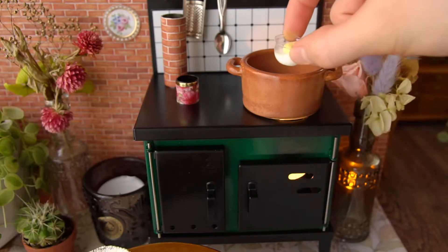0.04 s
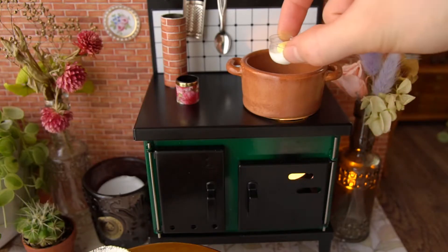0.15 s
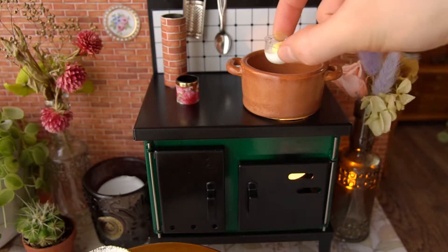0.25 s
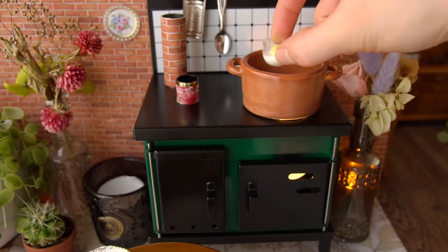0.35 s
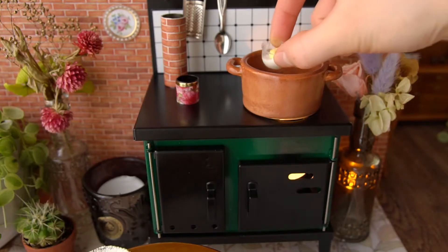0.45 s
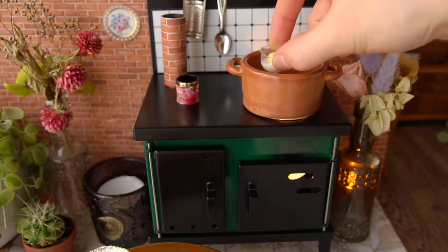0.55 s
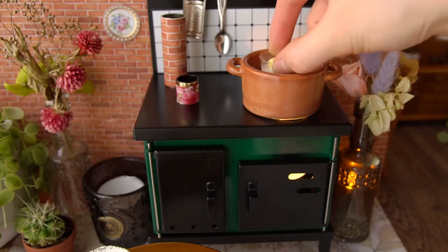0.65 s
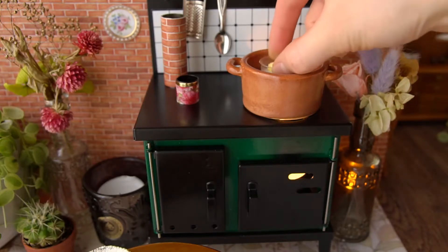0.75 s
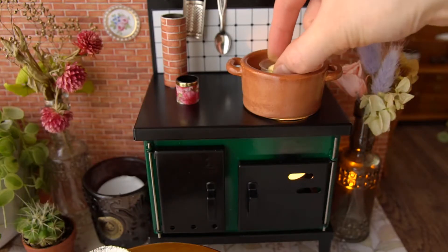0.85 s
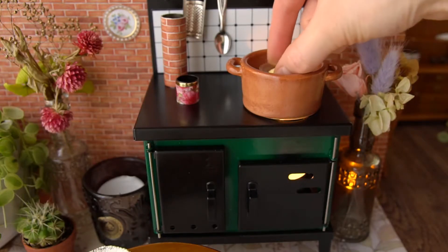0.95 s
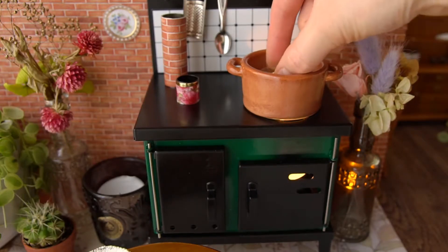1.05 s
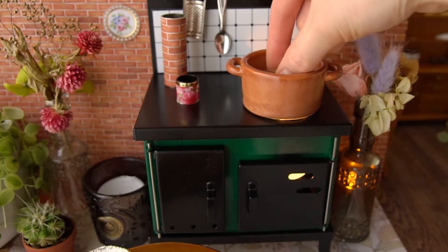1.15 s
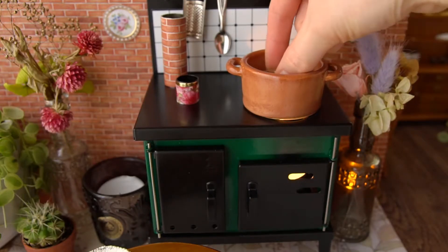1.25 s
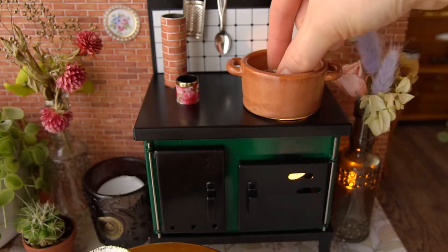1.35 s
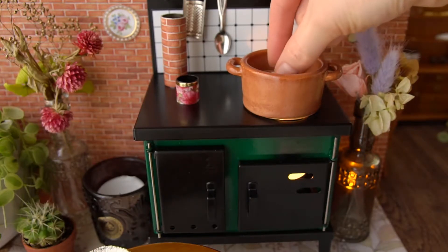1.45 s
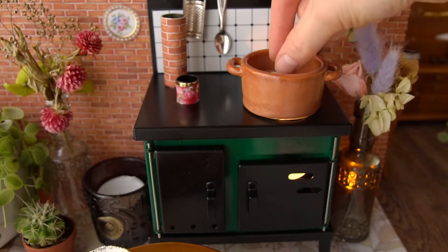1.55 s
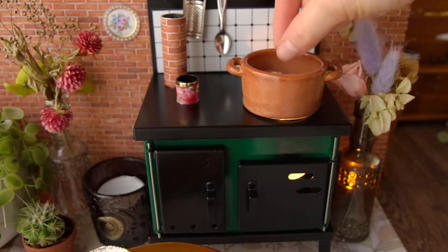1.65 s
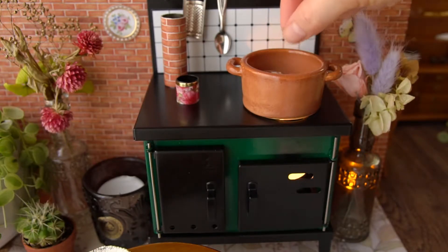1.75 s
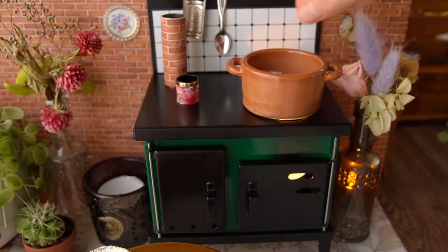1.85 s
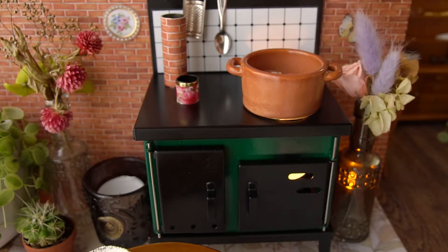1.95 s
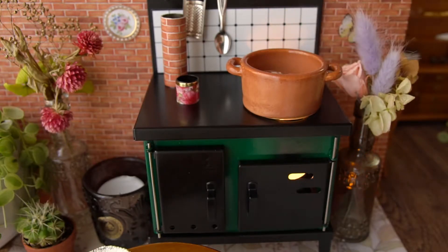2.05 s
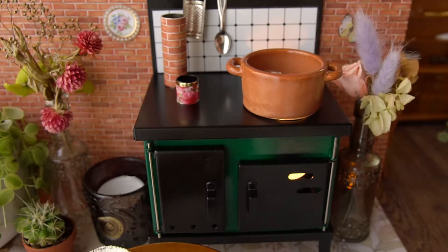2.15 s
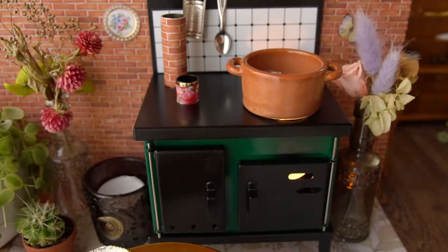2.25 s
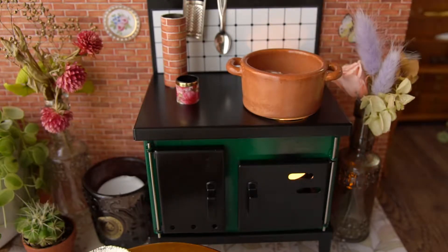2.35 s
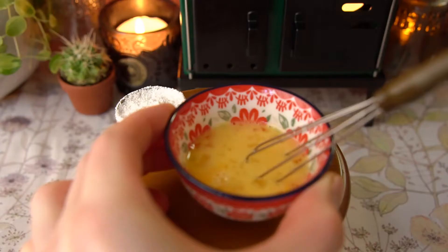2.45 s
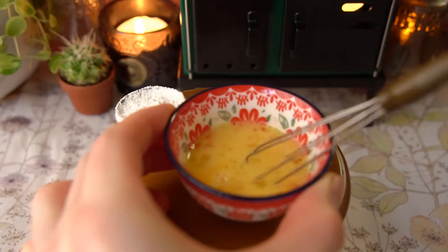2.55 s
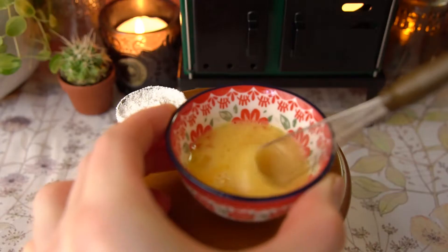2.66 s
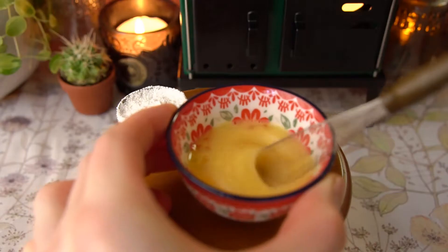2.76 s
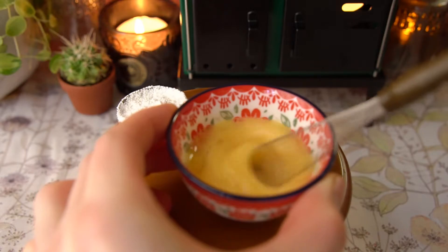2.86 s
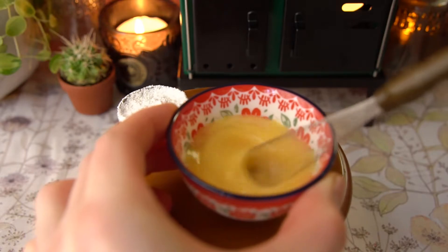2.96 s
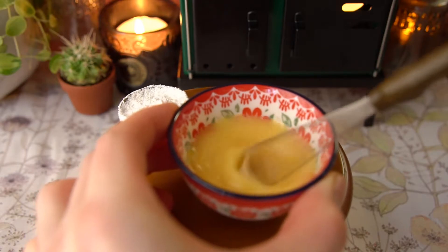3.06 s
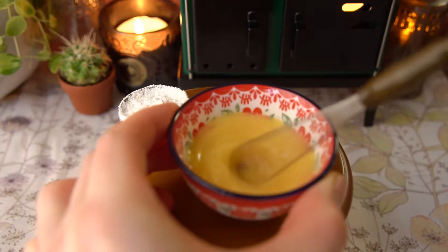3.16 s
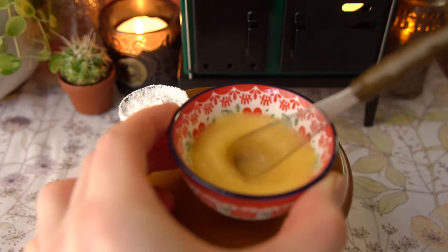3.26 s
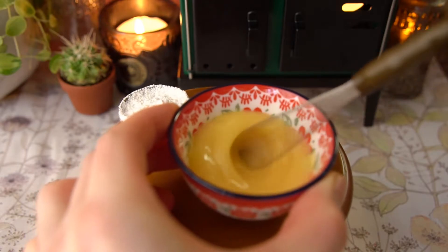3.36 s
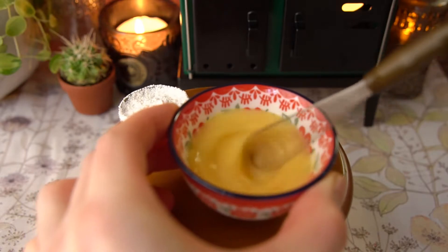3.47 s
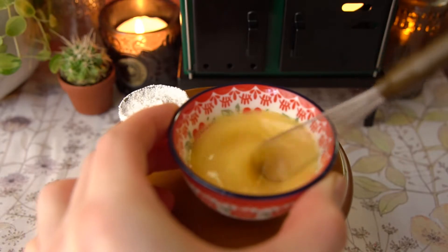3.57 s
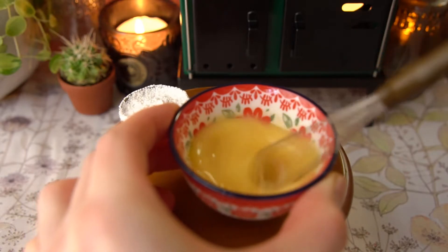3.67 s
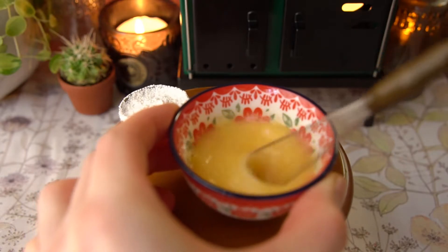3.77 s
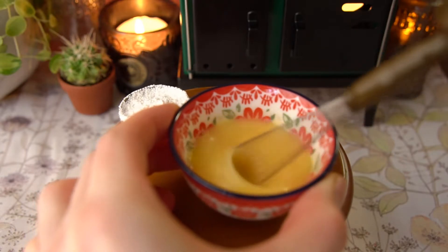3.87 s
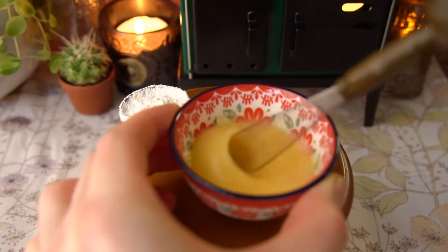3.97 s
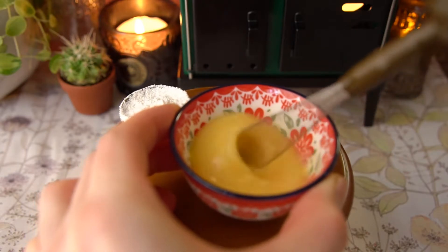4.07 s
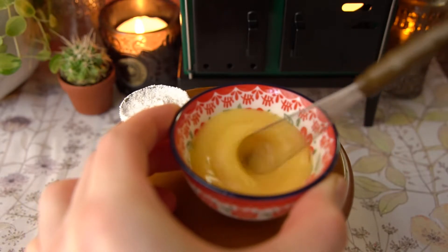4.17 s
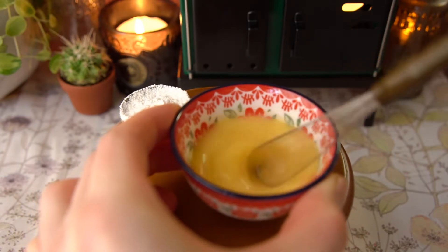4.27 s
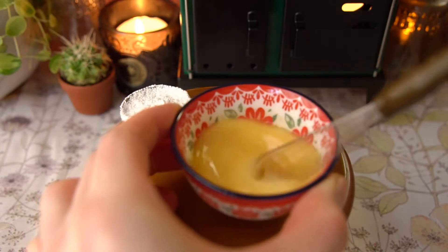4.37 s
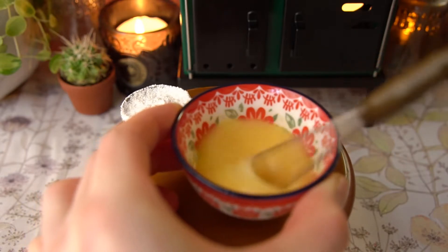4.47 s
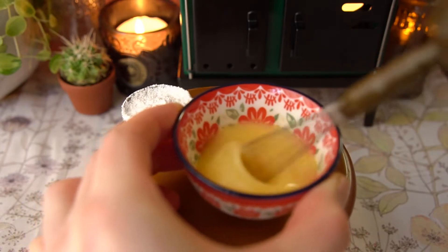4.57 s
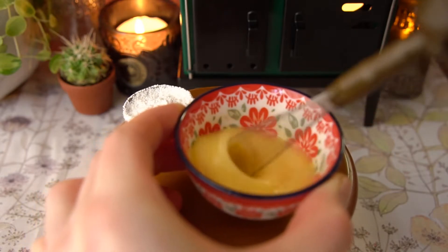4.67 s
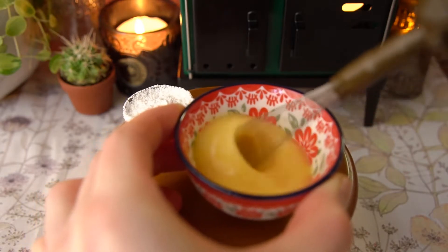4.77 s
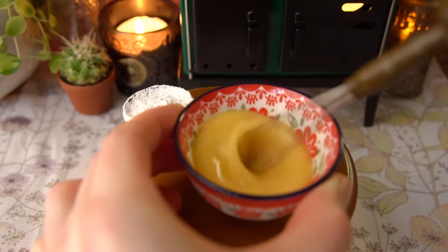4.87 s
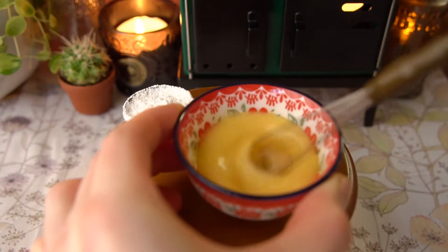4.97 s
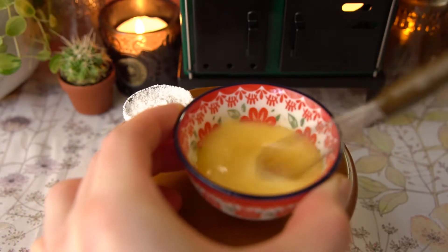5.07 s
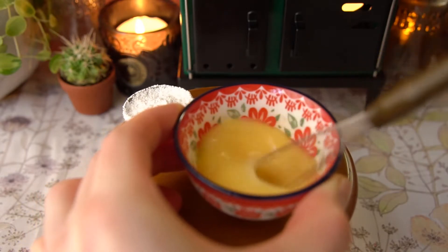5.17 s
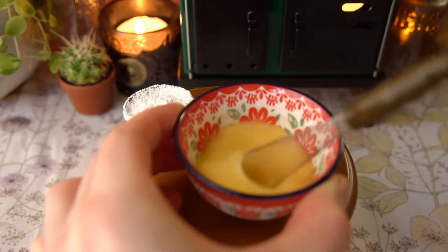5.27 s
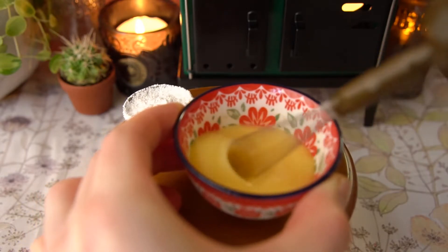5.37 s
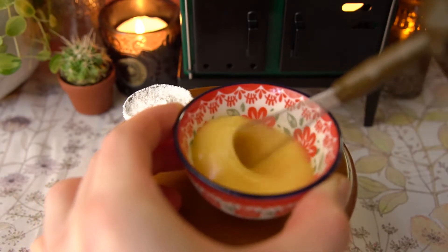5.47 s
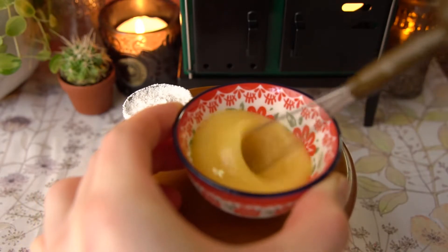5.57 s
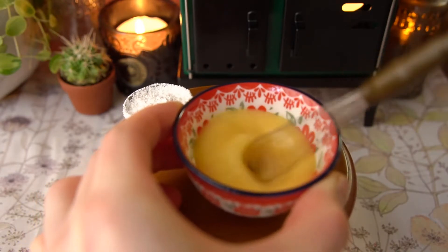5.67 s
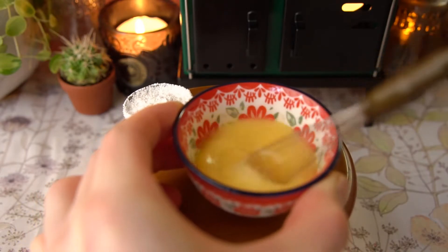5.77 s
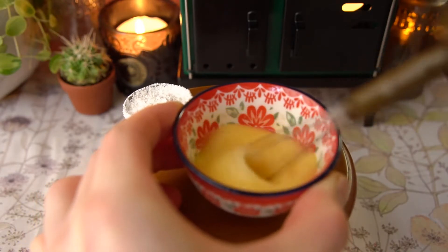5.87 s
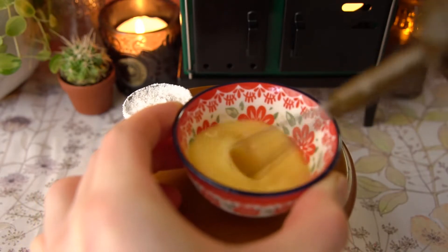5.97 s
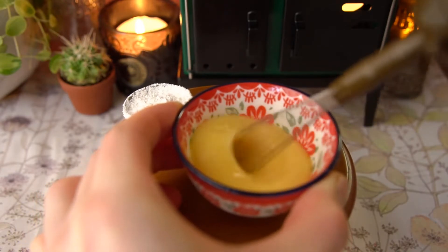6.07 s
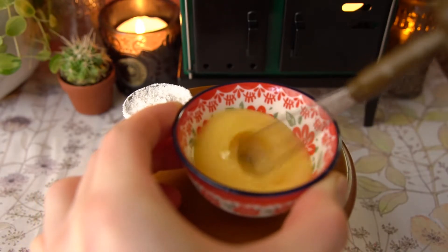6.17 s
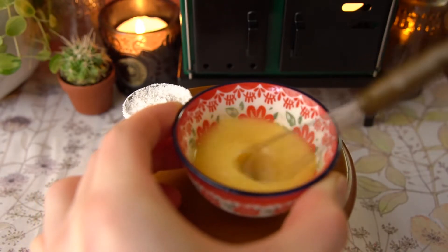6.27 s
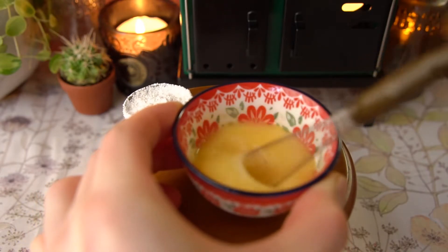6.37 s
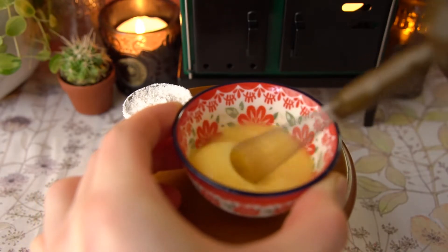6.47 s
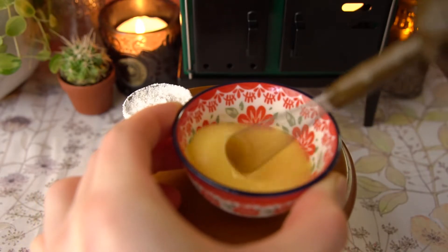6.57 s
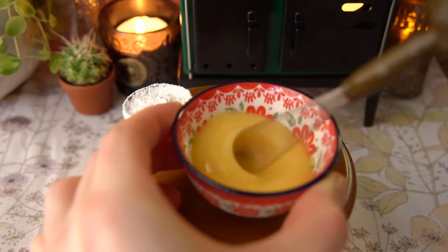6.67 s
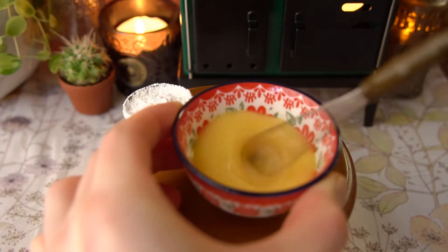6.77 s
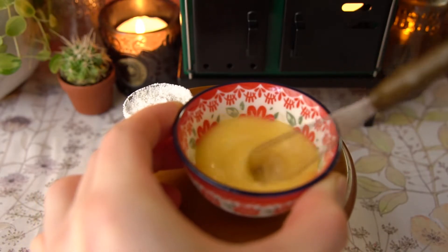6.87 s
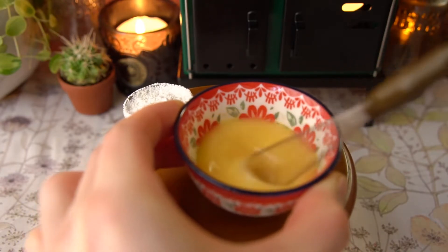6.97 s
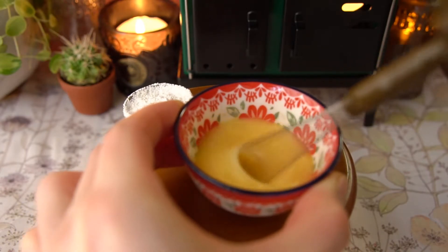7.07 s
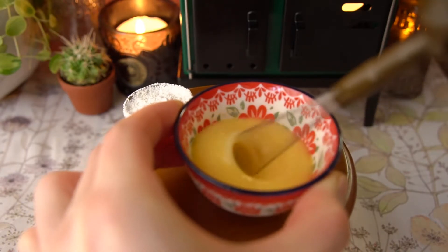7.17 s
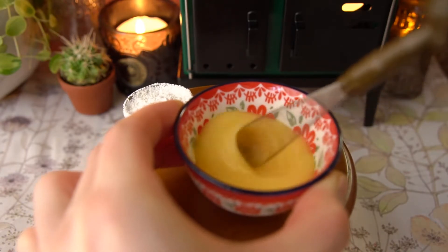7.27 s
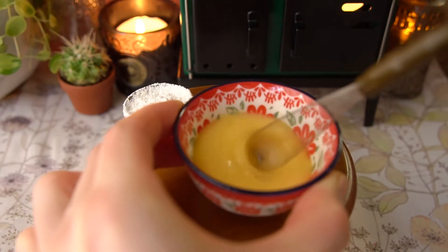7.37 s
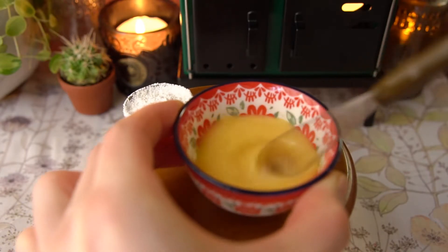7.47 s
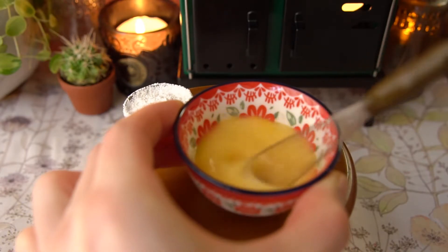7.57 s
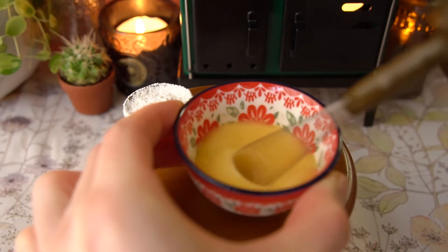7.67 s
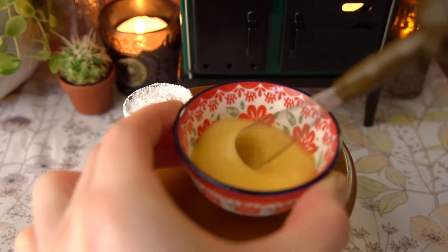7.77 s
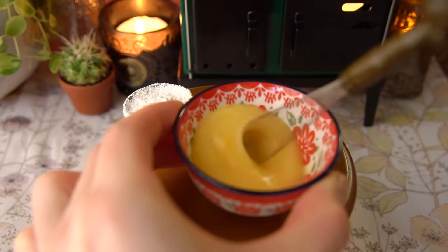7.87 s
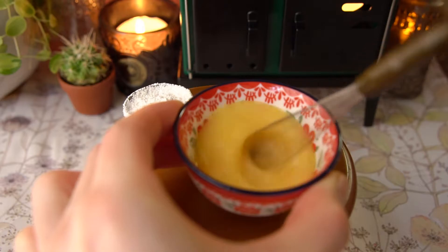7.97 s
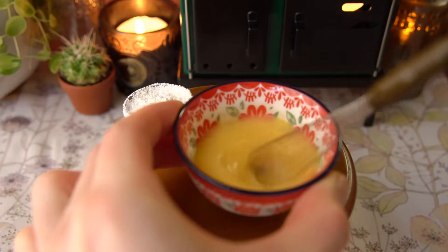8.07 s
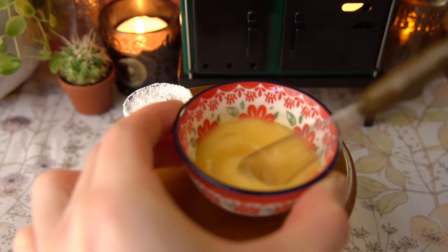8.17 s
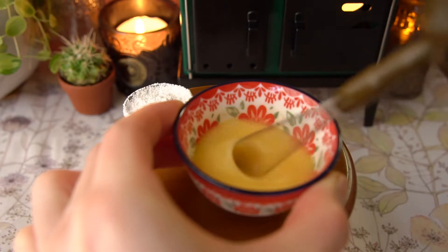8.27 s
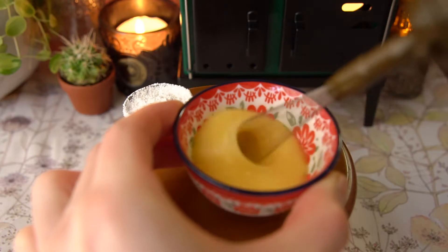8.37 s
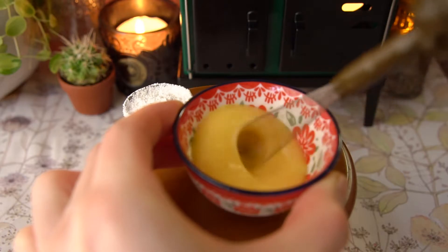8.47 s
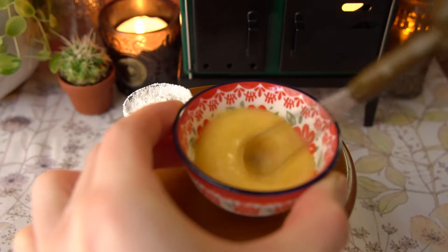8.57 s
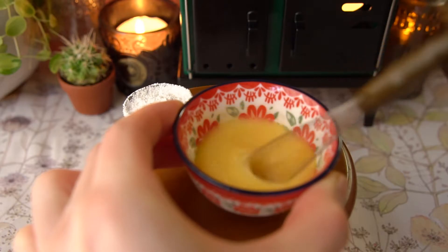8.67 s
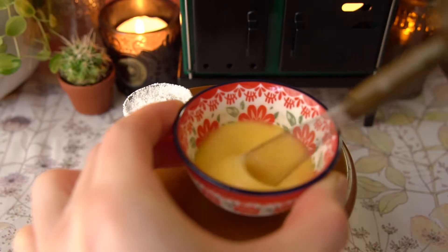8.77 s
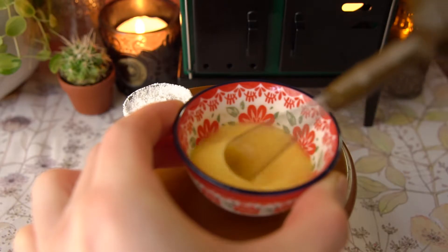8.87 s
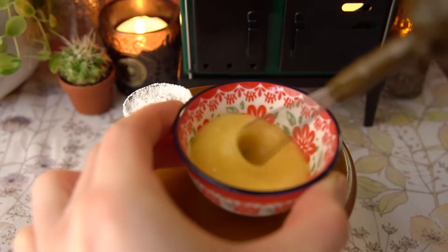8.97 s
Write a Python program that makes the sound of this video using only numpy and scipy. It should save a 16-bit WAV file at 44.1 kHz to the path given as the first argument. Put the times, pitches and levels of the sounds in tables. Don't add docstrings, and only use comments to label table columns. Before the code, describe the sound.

Faint shell-on-clay clicks in a quiet room, then a switch snap and a fast, bright, steady scraping clatter of wires in a small bowl.

```python
import sys
import numpy as np
from scipy import signal
from scipy.fft import rfft, irfft
from scipy.io import wavfile
from scipy.ndimage import uniform_filter1d

SR = 44100
rng = np.random.default_rng(int(sys.argv[2]) if len(sys.argv) > 2 else 0)


def log_audio(samples):
    frames = np.atleast_2d(samples).T
    limited = np.clip(frames, -1, 1)
    pcm = np.round(limited * 32767).astype(np.int16)
    wavfile.write(sys.argv[1], SR, pcm)


def elevation(decibels):
    levels = np.asarray(decibels, float)
    return 10 ** (levels / 20)


N = 397782

SCRAPE_DB = -31

LAP_S = [2.598, 2.964, 3.412, 3.733, 4.119, 4.634, 4.927, 5.203, 5.722, 6.002, 6.472, 6.766, 7.088, 7.346,
         7.579, 7.873, 8.272, 9.003]
LAP_COUNT = [0, 7, 16, 22, 30, 40, 46, 51, 61, 66, 75, 81, 87, 92, 96, 102, 110, 125]
# (time [s], jolt [dB], knock over jolt [dB], scrape swing per turn [dB])
HAND = [(2.6, -50, 8, -1), (2.93, -47.5, 14.5, 1), (3.1, -45, 1, 5.5), (3.42, -42, 4, 2),
        (3.68, -43, 8, 3.5), (3.8, -53.5, 16.5, 4), (4.13, -43.5, 8.5, 1.5), (4.42, -45.5, 8.5, 3.5),
        (4.92, -39, 7.5, 3.5), (5.22, -46.5, 11.5, 2.5), (5.7, -39.5, 8, 4), (5.93, -50.5, 15, 1.5),
        (6.24, -40, 7, 5), (6.5, -50, 14, 1.5), (6.78, -42, 2, 5.5), (7.85, -45, 13, 3), (8.4, -44, 9, 5),
        (9.05, -46, 11.5, 4.5)]
# (start [s], end [s], jolt loss [dB], knock loss [dB], swing loss [dB])
CLEAR = [
    (4.45, 4.66, 7.5, 4, 0.5),
    (6.95, 7.37, 16, 12, 6),
    (7.37, 7.43, 18, 19, 6.5),
    (7.43, 7.49, 1, 8, 3.5),
    (7.49, 7.81, 16, 14, 3),
    (8.73, 8.93, 10, 7, 1.5),
]


def turns():
    lap = np.arange(LAP_COUNT[-1] + 1)
    luck = np.minimum(rng.standard_normal((len(lap), 5)).T, 1.1)
    s = np.interp(lap, LAP_COUNT, LAP_S)
    when, *columns = np.transpose(HAND)
    jolt_db, over_db, swing_db = (np.interp(s, when, column) for column in columns)
    lost = sum(((s > start) & (s < end)) * np.c_[loss] for start, end, *loss in CLEAR)
    jolt_lost_db, knock_lost_db, swing_lost_db = lost

    spin_up_db, spin_up_s = -14.5, 0.13
    scrape_db = SCRAPE_DB + spin_up_db * np.exp(-(s - s[0]) / spin_up_s)
    swing_db = swing_db - swing_lost_db
    wall_share = 0.45
    luck_s, luck_jolt_db, luck_knock_db, luck_scrape_db = 0.0015, 2.5, 2, 0.76
    return np.c_[s + luck_s * luck[0],
                 jolt_db - jolt_lost_db + luck_jolt_db * luck[1],
                 jolt_db + over_db - knock_lost_db + luck_knock_db * luck[2],
                 scrape_db + wall_share * swing_db + 0.5 * luck_scrape_db * luck[3],
                 scrape_db - (1 - wall_share) * swing_db + luck_scrape_db * luck[4]]


def light_strikes(laps):
    chance, where, late, size = rng.random((len(laps), 4)).T
    reach_s = np.where(where < 0.4, 0.008, 0.05)
    s = laps[:, 0] + reach_s * late
    spread_db = 2.5 * np.sqrt(12) * (size - 0.5)
    db = -20 + laps[:, 3] - SCRAPE_DB - 2.0 + spread_db
    return list(np.c_[s, db][(chance < 0.6) & (s < N / SR)])


# (time [s], peak [dB])
STRIKES = [(3.1546, -17), (3.168, -19), (3.3658, -14), (3.9741, -17), (4.072, -17), (4.122, -14),
           (4.375, -15), (4.7181, -14), (4.838, -12), (4.9394, -16), (5.0289, -15), (5.5774, -13),
           (5.7386, -16), (6.103, -17), (6.1366, -19), (6.1554, -16), (6.3661, -16), (6.707, -12),
           (6.7715, -17), (7.047, -17), (7.222, -17), (7.4362, -15), (7.5218, -17), (7.735, -12),
           (7.8763, -16), (8.0689, -15), (8.161, -11), (8.4561, -13), (8.4632, -16), (8.561, -12)]
# (frequency [Hz], width [Hz], level in grip 1, 2, 3, 4 [dB])
BOWL = [(1346, 190, -15.5, -18, -15, -24), (1604, 160, -17, -15, -15, -12.5),
        (2204, 210, -13, -15.5, -17, -16), (2610, 125, -6.5, -9.5, -8, -19),
        (2971, 70, -5.5, -9.5, -9.5, -1.5), (3263, 160, -7, -9.5, -8.5, -9), (3990, 300, 1, -2, -5, -12),
        (4430, 140, -11, -7, -4, -7), (4680, 210, 2, 1, -1, 0), (5344, 194, -1, 1, 0.5, 0),
        (6190, 530, -1.5, -1, -2.5, 0.5), (6720, 250, -4.5, -6.5, -7.5, -10),
        (7180, 260, -5.5, -6, -7, -21), (7976, 260, -4.5, -4, -5.5, -7.5), (8640, 300, -6, -6.5, -8, -8),
        (10140, 230, -13, -15, -17, -16), (11940, 550, -16, -17, -21, -19),
        (14700, 860, -25, -27, -31, -27)]
GRIP_S = [2.57, 3.55, 4.45, 6.97, 9.1]
# (frequency [Hz], level [dB])
BETWEEN = [(100, -54), (940, -22.5), (2400, -16), (5000, -5.5), (7500, -16.5), (9000, -14), (11000, -25),
           (16000, -31)]
GRIP_DAMP_DB = [1, 1, 0.5, -1]


def scrape(laps, count=24):
    s, _, _, wall_db, free_db = laps.T
    t = np.arange(N) / SR
    times = np.c_[s - 0.004, s + 0.005, s + 0.016].ravel()
    levels_db = np.c_[wall_db + 0.7, wall_db + 0.7, free_db - 1.2].ravel()
    press_db = np.interp(t, np.r_[2.58, times], np.r_[-62, levels_db])

    struck = rng.random(N) < 5000 / SR
    tick_size = elevation(2.4 * np.minimum(rng.exponential(1, N), 3))
    ticks = struck * tick_size * rng.choice([-1, 1], N)
    clumps = uniform_filter1d(rng.standard_normal(N), size=150)
    chatter = elevation(1.85 * evened(clumps))
    hiss = 0.85 * rng.standard_normal(N)
    drive = evened(evened(ticks) * chatter + hiss) * elevation(press_db)
    for when, db in STRIKES + light_strikes(laps):
        add(drive, when, elevation([db + 6.5]))

    path = np.repeat(rng.integers(0, count, N // 1536 + 1), 1536)[:N]
    hop = np.repeat(rng.integers(0, count // 4, N // 64 + 1), 64)[:N]
    spot_of = (path + hop) % count

    base = elevation(read(BETWEEN, np.fft.rfftfreq(4096, 1 / SR))) ** 2
    out = np.zeros(N)
    for grip, (start, end) in enumerate(zip(GRIP_S, GRIP_S[1:])):
        held = slice(round(start * SR), round(end * SR))
        peaks = [(hz, width, db[grip]) for hz, width, *db in BOWL]
        damped = base * elevation(2 * GRIP_DAMP_DB[grip])
        spots = rng.standard_normal((count, 300))
        for k, spot in enumerate(spots - spots.mean(axis=0)):
            answer = signal.fftconvolve(body(peaks, spot, damped), smear(spot[40:240], 0.005))
            here = drive[held] * (spot_of[held] == k)
            add(out, start, signal.oaconvolve(here, answer / np.linalg.norm(answer)))
    return out


# (frequency [Hz], level [dB], t60 [s])
KNOCK = [(1345, -5.5, 0.013), (1620, -4.5, 0.0071), (1944, 3.5, 0.015), (2400, 9, 0.0096), (3010, 8, 0.011),
         (3460, 4, 0.0096)]
# (frequency [Hz], level [dB], t60 [s])
THUD = [(45.6, -17, 0.068), (57.7, -7.5, 0.29), (114, 0, 0.063), (205, -10.5, 0.061), (490, 1, 0.07),
        (724, -5, 0.099), (943, 6, 0.048)]


def knocks(laps):
    out, push = np.zeros(N), signal.windows.hann(24)
    jolt = signal.fftconvolve(push, ring(THUD, size=6000, lag=0.0698))
    for (s, thud_db, knock_db, *_), luck in zip(laps, rng.standard_normal((len(laps), 400))):
        modes = [(hz * (1 + 0.04 * a), db + 5 * b, t60)
                 for (hz, db, t60), a, b in zip(KNOCK, luck[300:], luck[350:])]
        wall = ring(modes, size=1000)
        slap = signal.fftconvolve(smear(luck, 0.022), wall / np.linalg.norm(wall))
        add(out, s - 0.001, elevation(knock_db + 19.5) * slap)
        second_s = 0.011 * (1 + 0.25 * luck[-1])
        second_db = -6 + 3.1 * luck[-2]
        add(out, s + second_s, elevation(knock_db + 19 + second_db) * slap)
        thud = signal.oaconvolve(jolt, smear(luck[::-1], 0.007)) / np.linalg.norm(jolt)
        add(out, s - 0.002, elevation(thud_db + 22.0) * thud)
    return out


# (frequency [Hz], level [dB])
SLOSH = [(28, -30), (60, -0.5), (140, -7), (205, -3.5), (330, -18), (500, -6), (700, -1), (960, 1.5),
         (1100, -11), (1500, 1), (4000, -35)]


def slosh(laps):
    s, thud_db = laps.T[:2]
    t = np.arange(N) / SR
    white = rfft(rng.standard_normal(N))
    wash = irfft(white * elevation(read(SLOSH, np.fft.rfftfreq(N, 1 / SR))), N)
    hits_db = uniform_filter1d(thud_db + 48, size=3)
    force_db = np.interp(t, np.r_[2.57, s], np.r_[-50, hits_db])
    turn = np.interp(t, s, np.arange(len(s))) % 1
    return evened(wash) * elevation(-52 + 0.85 * force_db - 10.5 * turn)


# (time [s], peak [dB])
DRY_WIRES = [(2.632, -36), (2.641, -46), (2.665, -44), (2.694, -40), (2.719, -38), (2.733, -38),
             (2.745, -41), (2.806, -40), (2.861, -40)]
# (frequency [Hz], width [Hz], level [dB])
WIRE = [(10300, 900, -8), (12100, 900, 2), (14700, 1100, -1)]


def spin_up():
    return clicks(DRY_WIRES, WIRE, 0.008)


# (time [s], peak [dB])
TRAVEL = [
    (2.506, -62),
    (2.5384, -34),
]
# (frequency [Hz], width [Hz], level [dB])
CASING = [(1200, 900, -13), (2400, 1000, -3), (3700, 1000, 0), (5600, 1500, -2), (8000, 2500, -12),
          (12500, 2500, -22)]
# (time [s], peak [dB])
SWITCH = [
    (2.561, -60),
    (2.5678, -45),
    (2.5703, -25),
    (2.5726, -19.5),
    (2.5743, -25),
]
# (frequency [Hz], width [Hz], level [dB])
BUTTON = [(1500, 1100, -23), (3060, 830, -6.5), (3900, 810, -2), (4870, 600, 1), (6400, 900, -10),
          (8250, 1300, -13), (9800, 2100, -12), (14000, 2500, -26)]


def switch():
    return clicks(TRAVEL, CASING, 0.01) + clicks(SWITCH, BUTTON, 0.009)


# (time [s], peak [dB])
SHELL = [
    (1.2058, -26),
    (1.2099, -22),
    (1.2285, -47),
    (1.4158, -28.5),
]
# (frequency [Hz], width [Hz], level [dB])
POT = [(1500, 1000, -17.5), (2720, 550, -6), (3580, 900, -14), (4770, 250, 2.5), (5500, 370, -6),
       (7600, 650, -9), (14300, 600, -42)]
# (time [s], peak [dB])
ROCK = [
    (.5725, -61),
    (1.3012, -49),
    (1.3665, -60),
    (1.3775, -58),
    (1.383, -51),
]
# (frequency [Hz], width [Hz], level [dB])
EGG = [(1800, 900, -8), (2750, 600, 0), (4750, 300, 0), (7700, 700, -11)]


def egg_in_pot():
    far_pot = [(hz, width + 900, db) for hz, width, db in POT]
    near = clicks(SHELL, POT, 0.0097) + clicks(ROCK, EGG, 0.013)
    return near + tail(clicks(SHELL, far_pot, 0.004), 0.12, -11.5)


# (time [s], boom [dB], start [Hz], end [Hz], slap [dB])
STEPS = [
    (.185, -56, 133.5, 69, -63),
    (0.291, -52, 123, 54.7, -64.5),
    (.815, -50.5, 134, 55, -63),
    (1.139, -54, 128, 65, -67),
]
# (time [s], level [dB], frequency [Hz], t60 [s])
BUMPS = [
    (.57, -56, 205, 0.25),
    (.705, -52, 251, 0.14),
    (.71, -55, 380, 0.091),
    (.71, -58, 624, 0.16),
    (1.1, -49, 337, 0.061),
]
# (frequency [Hz], width [Hz], level [dB])
SLAP = [(900, 360, 2), (1500, 700, -9), (3000, 1800, -13)]


def footfalls():
    out, t = np.zeros(N), np.arange(6000) / SR
    for s, boom_db, start_hz, end_hz, slap_db in STEPS:
        hz = np.interp(t, [0, 0.12], [start_hz, end_hz])
        boom = np.sin(2 * np.pi * np.cumsum(hz) / SR) * signal.windows.tukey(len(t), 0.6)
        add(out, s, elevation(boom_db) * boom)
        dull = body(SLAP, np.zeros(len(SLAP)))
        slap = signal.fftconvolve(rng.standard_normal(len(t)), dull)[:len(t)]
        add(out, s, elevation(slap_db - 60 * t / 0.3) * evened(slap))
    for s, db, hz, t60 in BUMPS:
        add(out, s, ring([(hz, db, t60)], size=6000) * np.minimum(t / 0.0065, 1))
    return out


# (frequency [Hz], level per Hz [dB])
ROOM = [(12, -59), (20, -28), (70, 1), (177, -13.5), (210, -9), (277, -19), (357, -14), (446, -21),
        (513, -18.5), (660, -20.5), (1000, -24.5), (1220, -28.5), (3440, -33), (13500, -36), (16000, -36)]
# (frequency [Hz], width [Hz], level [dB])
ROOM_LINES = [
    (207.7, 7.3, -78),
    (530, 33, -82.5),
]
# (time [s], level [dB])
CUT = [
    (0, 0.5),
    (2.41, 0.5),
    (2.425, -12),
    (2.53, -9),
    (2.6, -4.5),
    (9.1, -5.5),
]


def room():
    hz, t = np.fft.rfftfreq(N, 1 / SR), np.arange(N) / SR
    white = rfft(rng.standard_normal(N))
    floor = elevation(-63.5) * evened(irfft(white * elevation(read(ROOM, hz)), N))
    hums = np.zeros(N)
    for line_hz, width_hz, db in ROOM_LINES:
        hums += elevation(db) * evened(irfft(white / (1 + ((hz - line_hz) / width_hz) ** 2), N))
    whine = elevation(-82) * np.sin(2 * np.pi * 13902 * t)
    return (floor + hums + whine) * elevation(np.interp(t, *np.transpose(CUT)))


def clicks(events, peaks, contact_t60):
    out = np.zeros(N)
    for (s, db), luck in zip(events, rng.standard_normal((len(events), 200))):
        sound = signal.fftconvolve(body(peaks, 0.5 * luck), smear(np.r_[3., luck], contact_t60))
        add(out, s, elevation(db) * sound / abs(sound).max())
    return out


def body(peaks, spot, base=0.):
    hz = np.fft.rfftfreq(4096, 1 / SR)
    for (peak_hz, width_hz, db), weight, shift in zip(peaks, spot, spot[::-1]):
        offset = 2 * (hz - peak_hz * (1 + 0.0067 * shift)) / width_hz
        base = base + elevation(db + 3.8 * weight) ** 2 / (1 + offset ** 2) ** 1.28
    return causal(np.sqrt(base))


def causal(gain):
    log = np.log(np.r_[gain, gain[-2:0:-1]] + 1e-5)
    return np.fft.ifft(np.exp(log - 1j * signal.hilbert(log).imag)).real[:2048]


def rattle(noise, t60):
    run = noise * elevation(-60 * np.arange(len(noise)) / SR / t60)
    return run / np.linalg.norm(run)


def smear(noise, t60):
    spectrum = rfft(rattle(noise, t60), 512)
    return irfft(spectrum / abs(spectrum)) * np.hanning(1024)[512:]


def ring(modes, size=4000, lag=0.):
    out = np.zeros(size)
    for hz, db, t60 in modes:
        t = np.maximum(np.arange(size) / SR - lag / np.sqrt(hz), 0)
        out += elevation(db - 60 * t / t60) * np.sin(2 * np.pi * hz * t)
    return out


def tail(x, t60, db, delay_s=0.004):
    t = np.arange(8000) / SR
    taps = rng.standard_normal(len(t)) * elevation(-60 * t / t60) * (t > delay_s)
    taps = uniform_filter1d(taps, size=5)
    return elevation(db) * signal.oaconvolve(x, taps / np.linalg.norm(taps))[:N]


def evened(x):
    return x / np.sqrt(np.mean(x ** 2) + 1e-20)


def read(points, hz):
    f, value = np.transpose(points)
    return np.interp(np.log(hz + 1), np.log(f + 1), value)


def add(mix, s, sound):
    part = mix[round(s * SR):][:len(sound)]
    part += sound[:len(part)]


def scene():
    laps = turns()
    whisk = scrape(laps) + knocks(laps) + spin_up() + switch()
    near = whisk + tail(whisk, 0.13, -18) + slosh(laps) + egg_in_pot()
    return (near + footfalls() + room())[None]


def band_limit(x):
    return signal.sosfilt(signal.butter(12, 16940, fs=SR, output="sos"), x)


def record(dry):
    knee = 0.3
    limited = knee * np.tanh(dry / knee)
    low_cut = signal.butter(3, 32, "high", fs=SR, output="sos")
    edge = signal.firwin(1023, 15780, window=("kaiser", 7), fs=SR)
    mix = signal.oaconvolve(signal.sosfilt(low_cut, limited), edge[None], "same")
    return band_limit(mix)


dry = scene()
out = record(dry)
log_audio(out)
```